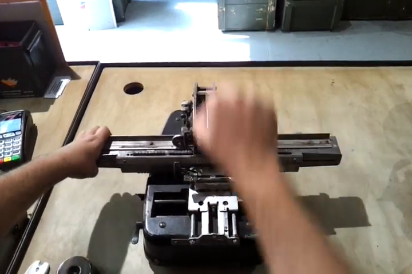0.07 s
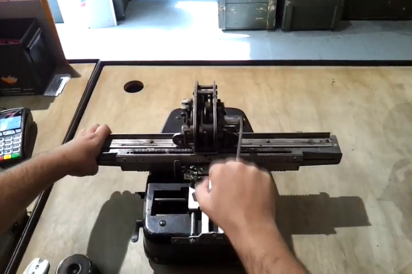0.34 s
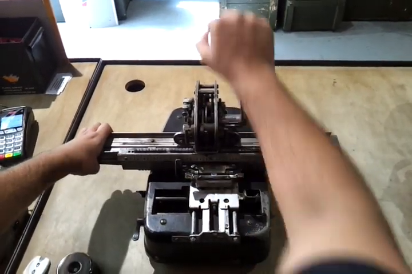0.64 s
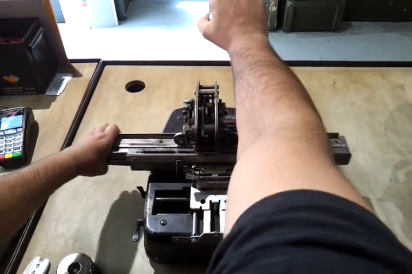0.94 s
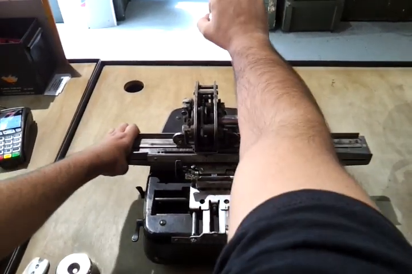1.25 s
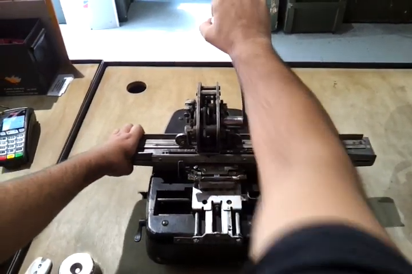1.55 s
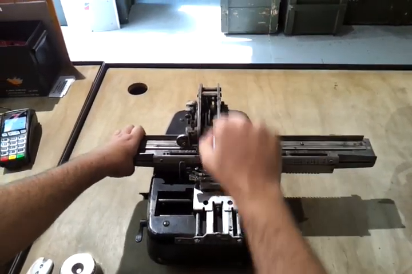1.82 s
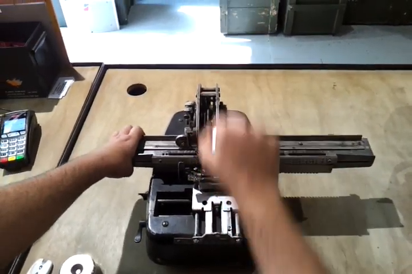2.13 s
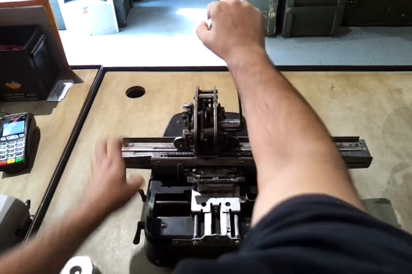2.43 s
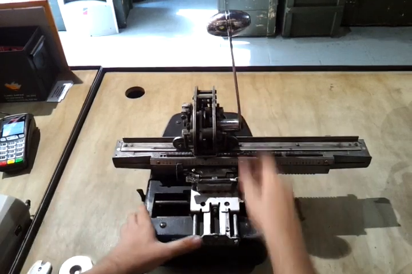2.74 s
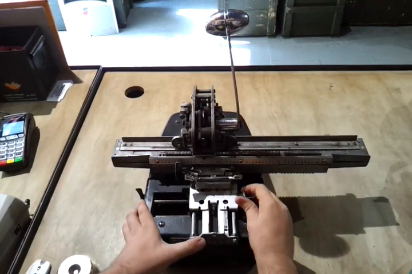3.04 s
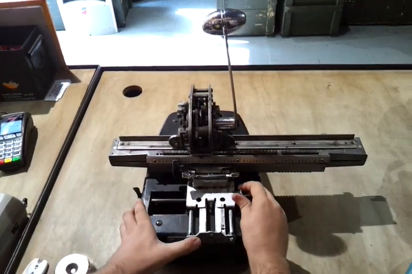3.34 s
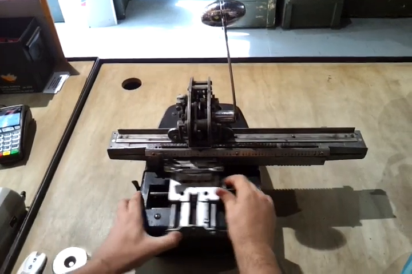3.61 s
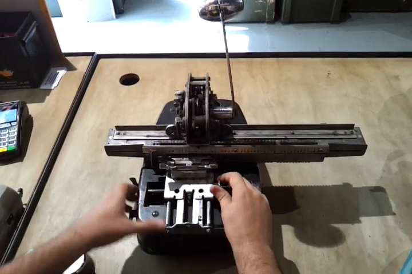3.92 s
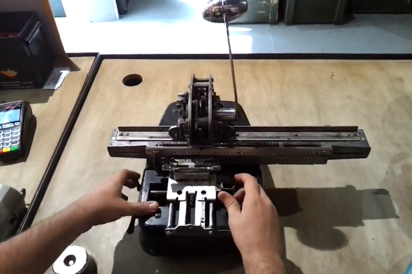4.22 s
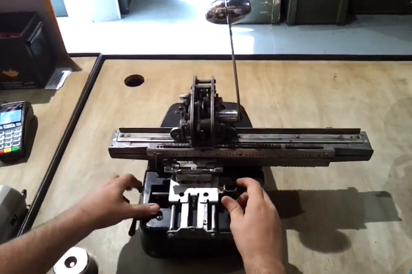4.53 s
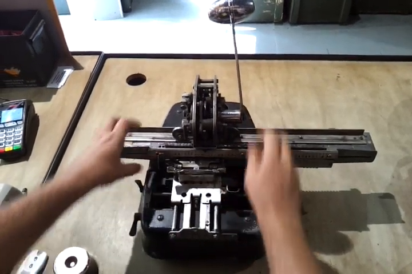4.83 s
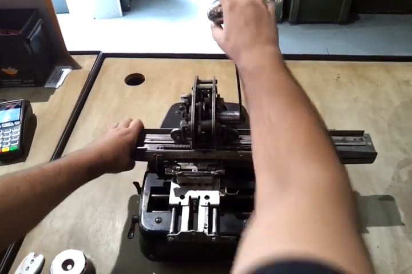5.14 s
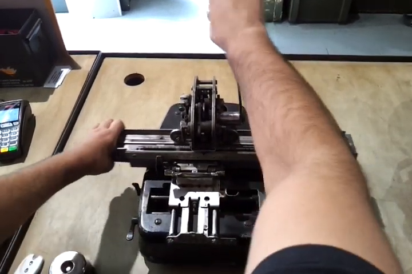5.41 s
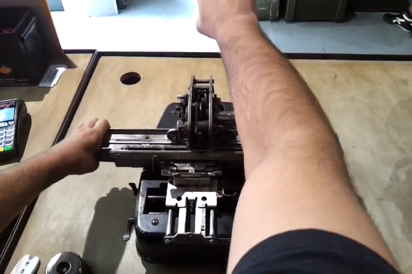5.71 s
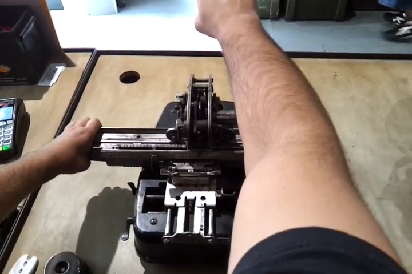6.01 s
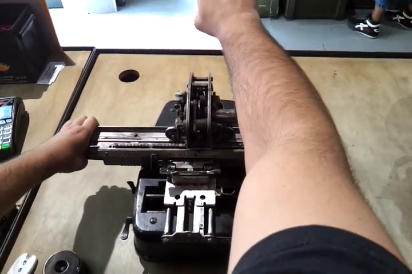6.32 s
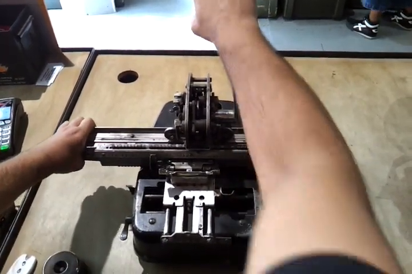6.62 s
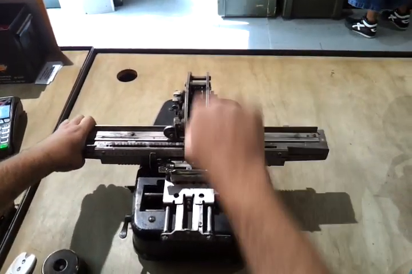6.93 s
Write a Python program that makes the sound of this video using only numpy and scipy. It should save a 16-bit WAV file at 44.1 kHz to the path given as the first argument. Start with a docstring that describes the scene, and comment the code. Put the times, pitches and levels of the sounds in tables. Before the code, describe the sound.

Metal clanks, clicks and table thuds come from an embossing machine's lever, and its carriage ratchets briefly before one last stroke.

```python
"""A cast-iron hand embossing machine on a wooden table, close by, over room rumble and hiss.
0-2.6 s: three lever strokes; iron slides and knocks on its stops, the feed pawl rings, the table thuds,
a thin high tone lingers. 3.2-5.1 s: the carriage is unlatched, a quick ratchet run speeds up and slows
down, the carriage is set. 6.4-7.2 s: another thin tone and a last stroke, ending in a table thud."""
import sys
import numpy as np
from scipy import signal
from scipy.fft import rfft, irfft, next_fast_len
from scipy.io import wavfile
from scipy.ndimage import uniform_filter1d, minimum_filter1d

SR = 44100
rng = np.random.default_rng(int(sys.argv[2]) if len(sys.argv) > 2 else 0)


def persist_wave(psi):
    """Save psi, clipped to +-1, as 16-bit WAV."""
    counts = np.round(np.clip(psi, -1, 1) * 32767).astype(np.int16)
    wavfile.write(sys.argv[1], SR, np.atleast_2d(counts).T)


N = 315756
TIME_S = np.arange(N) / SR
AGE_S = np.arange(SR // 4) / SR  # time since a blow

# metal-on-metal blows: start_s, frame_db, steel_db, favoured_hz, contact_kind
BLOWS = [ (0.1079, -21.5, -16, 930, "clank"), (.374, -29.5, -32, 1000, "clunk"),
         (.39, -30.5, -27.5, 1730, "thump"), (.411, -37.5, -30, 640, "clunk"),
         (.444, -30, -31, 1740, "click"), (.452, -29, -26, 950, "click"), (.563, -31, -27, 643, "scuff"),
         (.68, -45, -37, 1360, "clunk"), (.718, -29.5, -25, 1380, "click"), (.726, -34, -31, 905, "clang"),
         (0.7553, -16, -15, 1380, "clank"), (.762, -19, -10, 960, "slam"),
         (.867, -29, -24.5, 1016, "scuff"), (1.015, -50, -46.5, 1360, "clunk"),
         (1.12, -45, -43, 1630, "scuff"), (1.538, -36.5, -35, 980, "scuff"),
         (1.582, -22, -34, 1460, "clank"), (1.591, -32, -26, 960, "click"), (1.603, -43, -31, 640, "thump"),
         (1.618, -22.5, -20, 1500, "clank"), (1.796, -26, -22.5, 960, "clank"),
         (2.081, -41, -39, 1230, "scuff"), (2.091, -39, -28, 960, "click"),
         (2.121, -36, -32, 1730, "scuff"), (2.13, -40, -27.5, 1380, "click"),
         (2.149, -41, -34, 1380, "thump"), (2.258, -45, -36.5, 2500, "clank"),
         (2.349, -31.5, -29.5, 970, "rattle"), (2.378, -28, -21, 1340, "rattle"),
         (2.406, -14, -5.5, 1400, "slam"), (2.414, -20, -15, 900, "clack"),
         (2.462, -23.5, -22.5, 945, "click"), (2.474, -28, -21.5, 1760, "clang"),
         (2.49, -35, -23, 1780, "clang"), (2.503, -35, -25, 1220, "clank"), (2.517, -36, -44, 640, "clang"),
         (2.554, -42, -41.5, 1230, "snap"), (3.2515, -29.5, -17.5, 8100, "snap"),
         (3.408, -41, -41, 2960, "clack"), (3.842, -32.5, -59, 950, "click"),
         (3.875, -26.5, -30, 967, "snap"), (4.312, -38.5, -42, 910, "click"),
         (4.3218, -30.5, -30, 1490, "clack"), (4.361, -48, -34, 1740, "snap"),
         (4.372, -31, -34, 2522, "clack"), (4.429, -25, -29, 1600, "clank"),
         (4.435, -28, -22.5, 905, "click"), (4.444, -34.5, -26.5, 8400, "snap"),
         (4.612, -36.5, -31, 1640, "clunk"), (4.621, -27.5, -25.5, 640, "rattle"),
         (4.636, -29.5, -22.5, 8600, "snap"), (4.645, -28, -29.5, 968, "clack"),
         (4.655, -38, -30, 8000, "click"), (5.0871, -28.5, -30.5, 1560, "clack"),
         (6.632, -19, -20.5, 950, "clang"), (6.668, -38, -30, 7130, "snap"),
         (6.677, -16, -19.5, 1750, "clang"), (6.683, -16.5, -24, 953, "clang"),
         (6.692, -36, -21, 7500, "rattle"), (6.708, -24, -21.5, 1720, "clank"),
         (6.902, -30.5, -37, 900, "clang"), (6.914, -45, -27, 7600, "click"),
         (7.014, -31, -56, 960, "clang"), (7.062, -31.5, -33.5, 950, "thump"),
         (7.083, -32.5, -31, 640, "thump"), (7.094, -34, -28, 634, "click"),
         (7.125, -41, -33.5, 650, "clunk"), (7.141, -37, -35.5, 630, "click")]
# linkage spectrum: freq_hz, level_db
IRON_SPECTRUM = [(150, 2.5), (400, -4), (1000, -1.5), (1700, 5), (2300, -2.5), (3400, -6.5), (5200, -6.5),
                 (7200, 3), (8700, -2), (10000, -6.5), (12000, -17.5)]


def knocks():
    """Stops and links hit: thin steel answers at once and dies fast, the heavy frame lingers."""
    # cast frame: freq_hz, level_db, t60_s
    frame_modes = [(281.4, -15.5, 0.4), (361.9, -3.5, 0.31), (631.4, -3.5, 0.087), (910, -0.5, 0.045),
                   (970, -2, 0.067), (1052, -7.5, 0.045), (1202, -10, 0.09), (1390, 1, 0.036),
                   (1591, 2, 0.024), (1720, 0, 0.047), (1940, -4, 0.056), (2200, -9.5, 0.025),
                   (2515, -3.5, 0.028), (2926, -2, 0.026), (3450, -16, 0.081), (4290, -11, 0.045),
                   (5140, -2, 0.029), (6990, 1.5, 0.05), (7500, 4, 0.028), (7940, -10.5, 0.046),
                   (8100, -7, 0.058), (9460, -12, 0.059)]
    # per contact_kind: weight_db, bright_db, contact_s, t60_s
    contacts = {"slam": (-4, 2, .0005, .045), "clank": (-10, -1, .0007, .047),
                "clang": (-7, 4, .0004, .068), "clack": (-5, -5, .0006, .038),
                "click": (-1, 4, .0007, .052), "snap": (-4, 9, .0007, .06), "scuff": (-1, 2, .003, .048),
                "clunk": (6, 5, .002, .06), "thump": (10, 6, .002, .062), "rattle": (0, 4, .0008, .115)}
    rows = [(*row, *contacts[kind]) for *row, kind in BLOWS + rebounds() + loose_parts()]
    start_s, frame_db, steel_db, favoured_hz, weight_db, bright_db, contact_s, t60_s = np.transpose(rows)
    count, t60_s = len(rows), t60_s[:, None]
    # the place of the blow favours modes near one pitch
    offset_oct = np.log2(np.array(frame_modes)[:, 0] / favoured_hz[:, None])
    modes = ring(frame_modes, count, favour_db=10 * np.exp(-(offset_oct / .14) ** 2))
    dense = clatter(count)
    rods = ring(rod_modes(), count)
    crack = dense * fade(.8 * t60_s) + undb(-25) * rods
    clunk = band(undb(-20.5) * modes + dense * fade(2.3 * t60_s), 131, 777)
    frame = band(undb(-6) * modes + dense * fade(1.2 * t60_s), 700, 2200)
    clack = band(undb(-13.5) * modes + crack, 2814, 5880)
    tick = band(undb(-14) * modes + crack, 7500, 14700)
    return play(start_s, strike(clunk, frame_db + weight_db, contact_s + .001)
                + strike(frame, frame_db + .97, contact_s / 2 + .0004)
                + strike(clack, steel_db - bright_db / 2, contact_s / 2)
                + strike(tick, steel_db + bright_db / 2 - 1, contact_s / 2))


def rebounds(count=3, gap_s=.014, loss_db=3.5):
    """Blow rows: a slam throws the linkage back a few times, ever softer."""
    return [(start_s + (k + 1) * gap_s, frame_db - 12.5 - k * loss_db,
             steel_db - 20 - k * loss_db, hz, "click")
            for start_s, frame_db, steel_db, hz, kind in BLOWS if kind == "slam" for k in range(count)]


def loose_parts(count=14, spread_db=.5):
    """Blow rows: loose parts scuff faintly at random, following the handling level."""
    when, size, place = rng.random((count, 3)).T
    start_s = (np.arange(count) + when) / count * N / SR
    level_db = handling_db(start_s) - 10.5 + spread_db * (2 * size - 1)
    return [(at_s, db, db, hz, "scuff") for at_s, db, hz in zip(start_s, level_db, 900 * 2 ** place)]


def clatter(count):
    """The linkage's countless close modes as noise, one row per blow."""
    return noise(IRON_SPECTRUM, count * len(AGE_S)).reshape(count, -1)


def rod_modes(count=48, t60_s=.1):
    """Scattered, lightly damped modes of rods and levers."""
    freq_hz = rng.uniform(2200, 11500, count)
    level_db = np.interp(freq_hz, *np.transpose(IRON_SPECTRUM))
    return np.column_stack([freq_hz, level_db, np.full(count, t60_s)])


def pings():
    """Each struck part briefly sounds its own note."""
    start_s, frame_db, _, pitch_hz = np.transpose([row[:-1] for row in BLOWS])
    notes = np.sin(2 * np.pi * pitch_hz[:, None] * AGE_S) * fade(t60_s=.045)
    return play(start_s, strike(notes, frame_db - 11.5, contact_s=.0008))


def pawl():
    """The flicked steel feed pawl rings in two mode clusters."""
    # flicks: start_s, low_db, high_db
    flicks = [(.393, -27, -26), (.41, -43, -27), (.447, -22, -16), (.679, -38, -42), (.719, -24, -24),
              (.726, -27, -17.5), (.761, -22, -19), (1.796, -22, -33), (2.092, -34, -20), (2.13, -24, -31),
              (2.347, -25, -34), (2.38, -18.5, -17.5), (2.391, -18.5, -43), (2.426, -30, -24),
              (2.471, -22.5, -42), (2.504, -27, -40), (7.095, -31, -23)]
    # clusters: freq_hz, level_db, t60_s
    low_modes = [(6610, -5, .085), (6795, 0, .075), (7050, -9, .025)]
    high_modes = [(8400, -9, .02), (8575, 0, .045), (8670, -6, .03), (11720, -14, .05)]
    start_s, low_db, high_db = np.transpose(flicks)
    low = strike(ring(low_modes, len(flicks)), low_db + 2.5, contact_s=.0002)
    high = strike(ring(high_modes, len(flicks)), high_db + .5, contact_s=.00021)
    return play(start_s, low + high)


def ratchet(teeth=15, jitter_s=.0003, wheel_lag_s=.00085):
    """The spring snaps over each tooth and the wheel answers; the teeth are alike, so the run buzzes."""
    # wheel and spring: freq_hz, level_db, t60_s
    wheel_modes = [(362, -9, 0.042), (660, -14, 0.12), (914, 1.5, 0.044), (986, -5, 0.057),
                   (1360, -16, 0.031), (1663, 7, 0.045), (1750, 12.5, .024), (1917, 3, 0.05)]
    spring_modes = [(2350, -6, 0.013), (2710, -13.5, 0.06), (4830, -12, .012), (5440, -4.5, 0.027),
                    (5920, -2, 0.019), (6680, -4, .012), (7650, 2, 0.013), (7120, 11, 0.012),
                    (7830, 8.5, 0.012), (8180, 0.5, 0.019), (8300, -9, 0.012), (9260, -8, .015),
                    (10600, 0, 0.014), (11460, 2.5, 0.021)]
    late, strong = rng.standard_normal((teeth, 2)).T
    start_s = tooth_times(teeth) + jitter_s * late
    force_db = np.r_[-2.5, np.zeros(teeth - 2), -2.5] + .8 * strong
    alike = clatter(1)
    wheel_rasp = band(alike + undb(-4) * clatter(teeth), 410, 2200) * fade(.07)
    spring_rasp = band(alike + clatter(teeth), 2300, 14000) * fade(.045)
    wheel = ring(wheel_modes, teeth, scatter=.12) + undb(-1) * wheel_rasp
    spring = ring(spring_modes, teeth, scatter=.3) + undb(2.5) * spring_rasp
    return (play(start_s + wheel_lag_s, strike(wheel, force_db - 18, contact_s=.0011))
            + play(start_s, strike(spring, force_db - 14.5, contact_s=.0008)))


def tooth_times(teeth, start_s=3.5402, length_s=.1585, end_speed_ratio=.42):
    """Teeth pass at equal angles while the wheel's speed rises and falls in an arch."""
    progress = np.linspace(0, 1, 200)
    angle = np.cumsum(end_speed_ratio + (1 - end_speed_ratio) * np.sin(np.pi * progress))
    return start_s + length_s * np.interp(np.linspace(angle[0], angle[-1], teeth), angle, progress)


def table_thuds(bounce_hz=74, twist_hz=118, attack_s=.0034):
    """The machine's weight lands on the table: two low modes hum on over short board noise."""
    # landings: start_s, level_db, t60_s
    thuds = [(.109, -30, 0.15), (.378, -19, 0.21), (.388, -17.5, 0.17), (.444, -29, 0.43),
             (.758, -29, 0.59), (1.599, -31, .25), (1.80, -36, .2), (2.41, -28, 0.36), (2.487, -22, 0.29),
             (2.516, -34, .47), (4.439, -30, .23), (4.634, -29.5, 0.16), (5.09, -36, 0.57),
             (6.682, -25, 0.25), (7.068, -16.5, 0.25), (7.081, -25, .48)]
    # boards: freq_hz, level_db
    board_spectrum = [(40, -12), (75, -13), (115, 6), (190, -22), (290, -1), (380, -9), (520, -10),
                      (900, -30.5)]
    track, age_s = np.zeros(N), np.arange(SR) / SR
    for start_s, level_db, t60_s in thuds:
        swing = fade(t60_s, age_s) + undb(-19) * fade(1.7, age_s)
        bounce = -np.sin(2 * np.pi * bounce_hz * age_s)
        twist = undb(-7) * np.sin(2 * np.pi * (twist_hz * age_s + rng.random()))
        boards = undb(-3) * noise(board_spectrum, SR) * fade(.85 * t60_s, age_s)
        onset = 1 - np.exp(-age_s / attack_s)
        add(track, start_s, undb(level_db + .5) * ((bounce + twist) * swing + boards) * onset)
    return track


def sliding():
    """Dry iron slides on iron in tiny uneven slips; the carriage creeps between lever travels."""
    # lever travels: start_s, hold_s, level_db
    travels = [(0, 0.099, -39), (0.382, 0.49, -36.5), (1.57, 0.24, -35), (2.14, 0.089, -35),
               (2.326, .22, -41), (6.752, 0.23, -36.5), (7.084, 0.065, -37)]
    # friction: freq_hz, level_db
    rub_spectrum = [(200, -6.5), (400, -12), (700, -4.5), (920, 2.5), (1080, -6.5), (1250, 1), (1450, -2),
                    (1730, -2), (2100, -9), (3500, -14), (7000, -15.5), (11000, -29.5)]
    lever = sum(undb(db) * swell(start_s, hold_s, attack_s=.044, t60_s=.44)
                for start_s, hold_s, db in travels)
    creep = undb(handling_db(TIME_S) - 12)
    slips_db = 2 * walk(70) + .5 * walk(400)
    return np.hypot(lever, creep) * undb(slips_db) * noise(rub_spectrum, N)


def thin_tones():
    """Two thin high steel tones swell and linger, the first near the pawl's pitch."""
    # tones: start_s, hold_s, pitch_hz, level_db
    tones = [(1.69, .04, 6830, -44), (6.46, .18, 5674, -51)]
    track = np.zeros(N)
    for start_s, hold_s, pitch_hz, level_db in tones:
        tone = np.sin(2 * np.pi * np.cumsum(pitch_hz + 5 * walk(30)) / SR)
        track += undb(level_db) * swell(start_s, hold_s, attack_s=.06, t60_s=.43) * tone
    return track


def handling():
    """The table rumbles softly as lever and carriage are moved."""
    # rumble: freq_hz, level_db
    spectrum = [(20, -7), (45, -2), (75, -1.5), (150, -13), (350, -19), (700, -21.5), (1500, -75)]
    return undb(handling_db(TIME_S) + 2 * walk(13)) * noise(spectrum, N)


def handling_db(time_s):
    """How hard the hands work the machine, as a rumble level."""
    # effort: time_s, level_db
    effort = [(0, -39.5), (1.2, -41), (2.6, -38.5), (3.3, -43), (4.8, -44), (5.5, -48.5), (6.5, -53),
              (6.8, -46)]
    return np.interp(time_s, *np.transpose(effort))


def room(x, delay_s=.005, build_s=.0087):
    """Diffuse reflections from table and walls; the treble dies first."""
    response, age_s = np.zeros(SR), np.arange(SR) / SR
    onset = np.clip((age_s - delay_s) / build_s, 0, 1)
    for lo_hz, hi_hz, t60_s, gain_db in [(103, 580, .69, -6.5), (680, 2240, .24, -11.5),
                                         (2200, 7240, .23, -14), (8000, 12000, .22, -19.5)]:
        tail = rng.standard_normal(SR) * fade(t60_s, age_s) * onset
        response += undb(gain_db) * band(tail / np.linalg.norm(tail), lo_hz, hi_hz)
    return signal.fftconvolve(x, response)[:N]


def room_tone():
    """Low rumble and faint hiss, wavering slightly."""
    # background: freq_hz, level_db
    rumble_spectrum = [(20, -4), (32, 0.5), (46, 0.5), (60, -11), (80, -8.5), (110, -2.5), (170, -18),
                       (220, -13.5), (265, -7), (390, -12.5), (540, -8), (700, -14), (850, -11.5),
                       (1000, -50)]
    hiss_spectrum = [(700, -31), (950, 3.5), (1130, -1.5), (1260, 1), (1430, -1.5), (1650, 2), (2050, -9),
                     (2900, -5), (3600, -10), (5500, -8.5), (7400, -5.5), (9000, -14), (11500, -27.5)]
    rumble = undb(-43 + 1.4 * walk(4.66)) * noise(rumble_spectrum, N)
    hiss = undb(-46 + .24 * walk(8.2)) * noise(hiss_spectrum, N)
    return rumble + hiss


def ring(modes, count, scatter=1, favour_db=0):
    """One ring per blow; a scattered contact point varies each mode's level and phase."""
    freq_hz, level_db, t60_s = np.transpose(modes)[:, :, None]
    shapes = undb(level_db) * fade(t60_s) * np.exp(2j * np.pi * freq_hz * AGE_S)
    chance = scatter * (rng.random((count, len(modes), 2)) - .5)
    weights = undb(14 * chance[..., 0] + favour_db) * np.exp(2j * np.pi * chance[..., 1])
    return (weights @ shapes).imag


def strike(rings, level_db, contact_s):
    """Build each ring up over contact_s; give it the energy of 10 ms at level_db."""
    rise_s = np.maximum(np.reshape(contact_s, (-1, 1)), 1 / SR)
    rings = rings * (1 - np.exp(-AGE_S / rise_s)) ** 2
    power = np.sum(rings ** 2, axis=-1, keepdims=True) / (.01 * SR)
    return rings * undb(level_db)[:, None] / np.sqrt(power)


def noise(spectrum, size):
    """Unit-rms noise shaped by freq_hz, level_db points."""
    freq_hz, level_db = np.transpose(spectrum)
    count = next_fast_len(size)
    bins_hz = np.maximum(np.fft.rfftfreq(count, 1 / SR), 1)
    gain = undb(np.interp(np.log(bins_hz), np.log(freq_hz), level_db))
    x = irfft(rfft(rng.standard_normal(count)) * gain, count)[:size]
    return x / x.std()


def walk(rate_hz):
    """Random steps, smoothed twice."""
    hold = int(SR / rate_hz)
    steps = np.repeat(rng.standard_normal(N // hold + 1), hold)
    return 2 * uniform_filter1d(uniform_filter1d(steps, hold), hold)[:N]


def swell(start_s, hold_s, attack_s, t60_s):
    """Rise until start_s, hold, die away."""
    rise = np.clip(1 + (TIME_S - start_s) / attack_s, 0, 1)
    return rise * fade(t60_s, np.maximum(TIME_S - start_s - hold_s, 0))


def fade(t60_s, age_s=AGE_S):
    return np.exp(-np.log(1000) * age_s / t60_s)


def band(x, lo_hz, hi_hz):
    return signal.sosfilt(signal.butter(3, [lo_hz, hi_hz], "band", fs=SR, output="sos"), x)


def undb(db):
    return 10 ** (np.asarray(db) / 20)


def add(track, start_s, sound):
    start = int(start_s * SR)
    track[start:start + len(sound)] += sound[:max(N - start, 0)]


def play(starts_s, sounds):
    track = np.zeros(N)
    for start_s, sound in zip(starts_s, sounds):
        add(track, start_s, sound)
    return track


def scene():
    """Machine, room and background in mono; the ratchet faces the listener and sounds drier."""
    machine = knocks() + pings() + pawl() + sliding() + thin_tones()
    teeth = ratchet()
    reflections = room(machine + undb(-5) * teeth)
    return (machine + teeth + reflections + table_thuds() + handling() + room_tone())[None]


def record(dry, ceiling=.72, cutoff_hz=12000):
    """Fast peak limiter, then a steep low-pass."""
    gain = np.minimum(1, ceiling / (np.abs(dry) + 1e-9))
    gain = uniform_filter1d(minimum_filter1d(gain, size=91), size=91)
    return signal.sosfilt(signal.ellip(10, .2, 70, cutoff_hz, fs=SR, output="sos"), dry * gain)


dry = scene()
out = record(dry)
persist_wave(out)
```